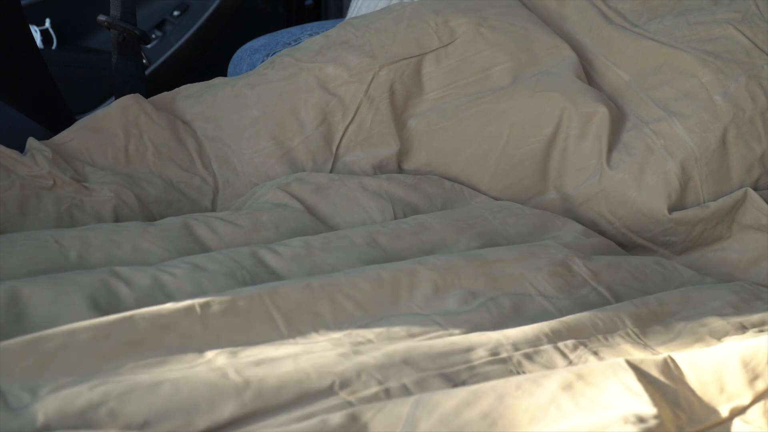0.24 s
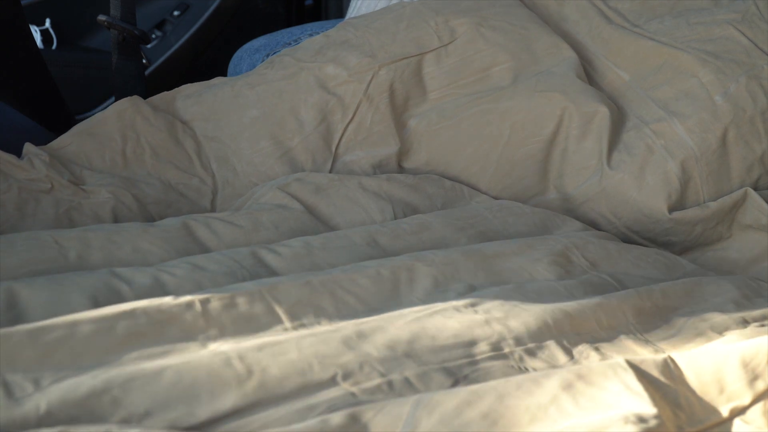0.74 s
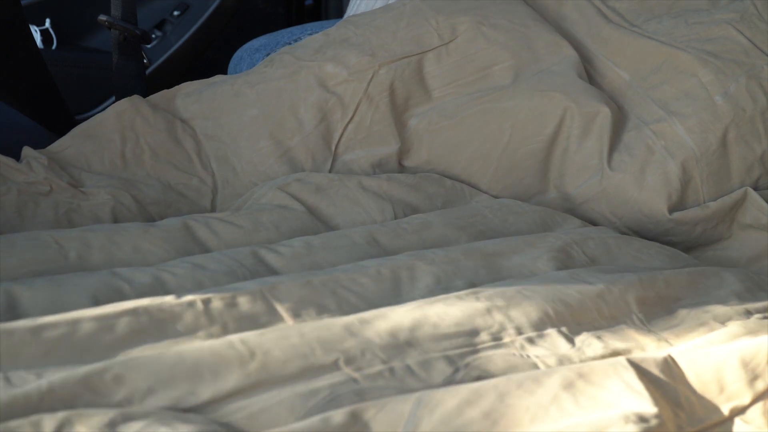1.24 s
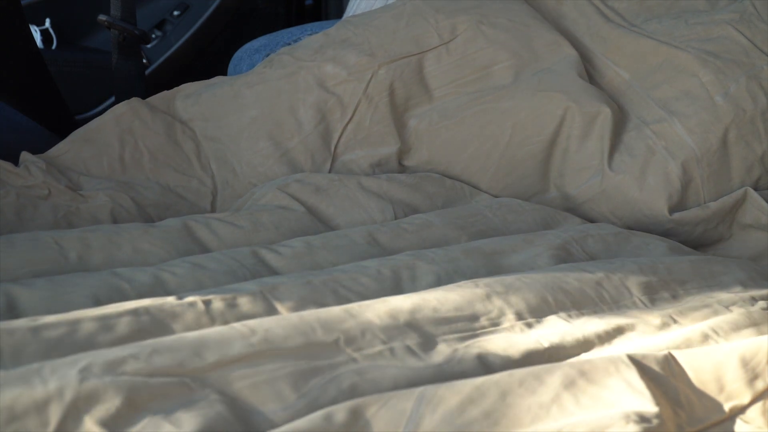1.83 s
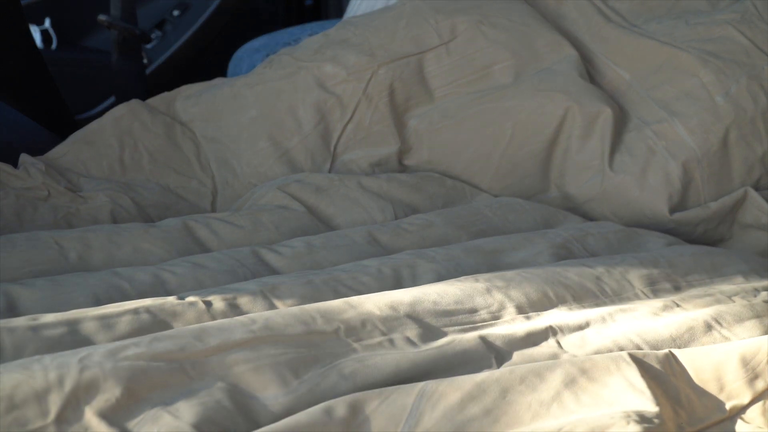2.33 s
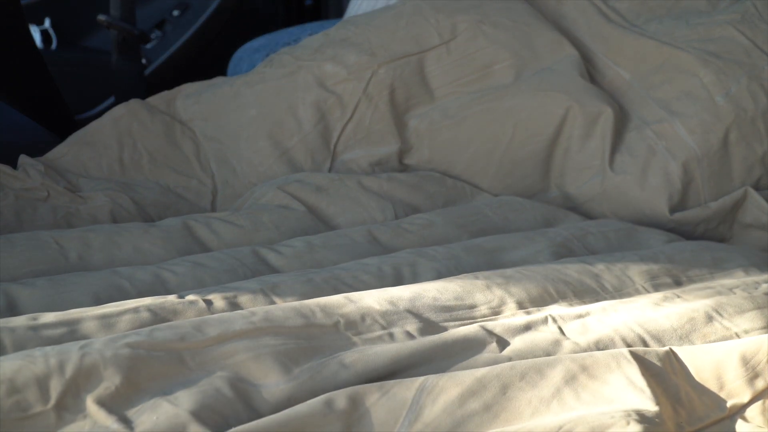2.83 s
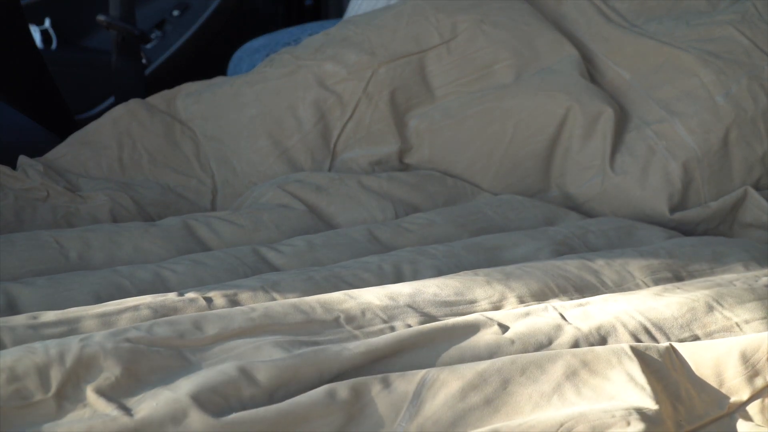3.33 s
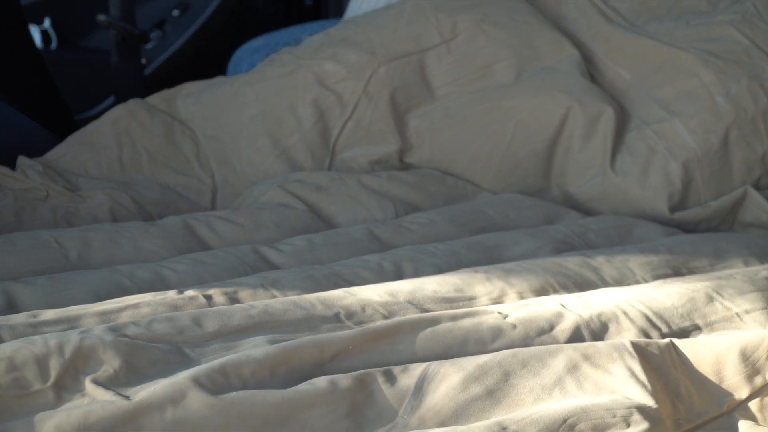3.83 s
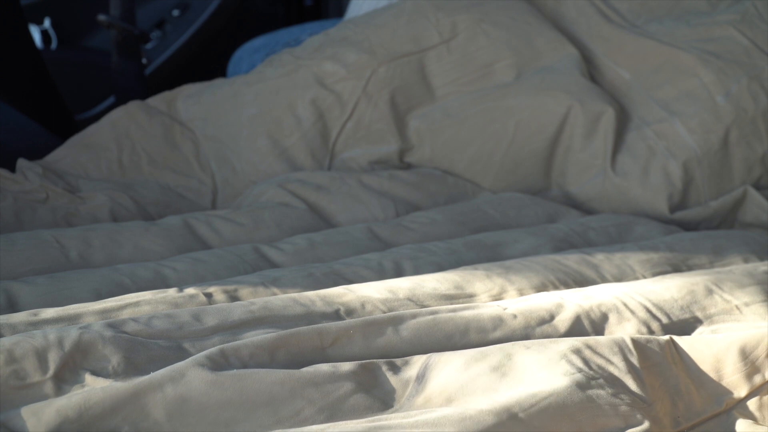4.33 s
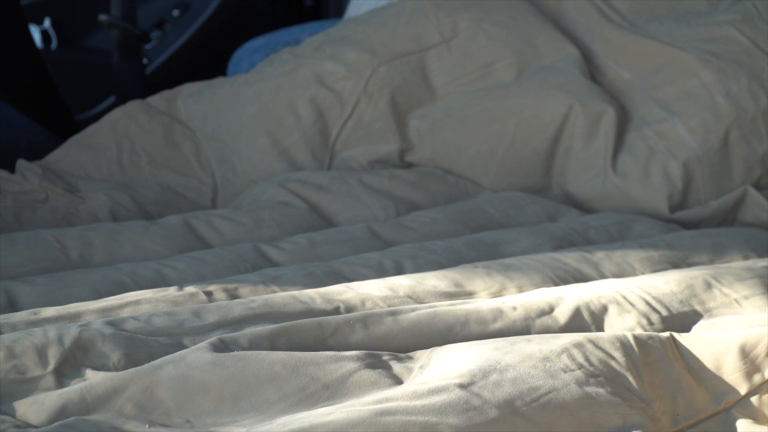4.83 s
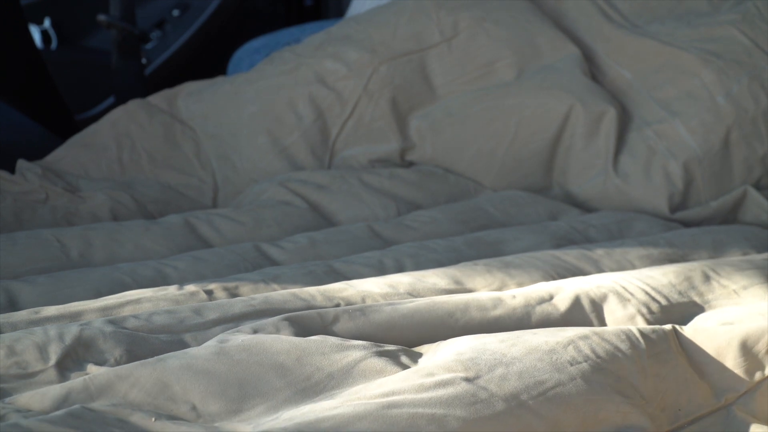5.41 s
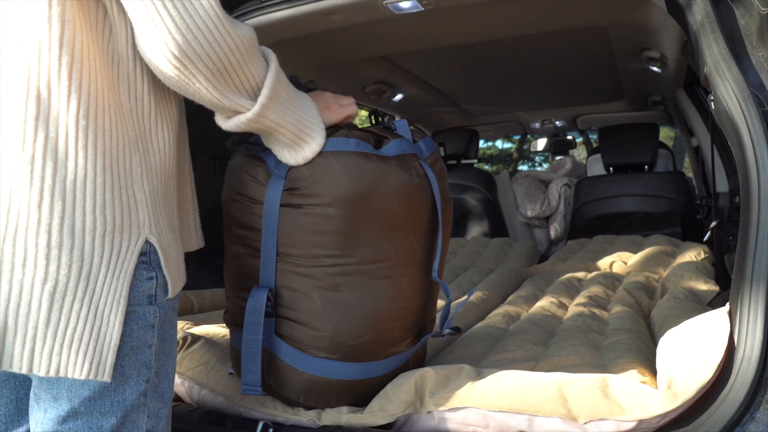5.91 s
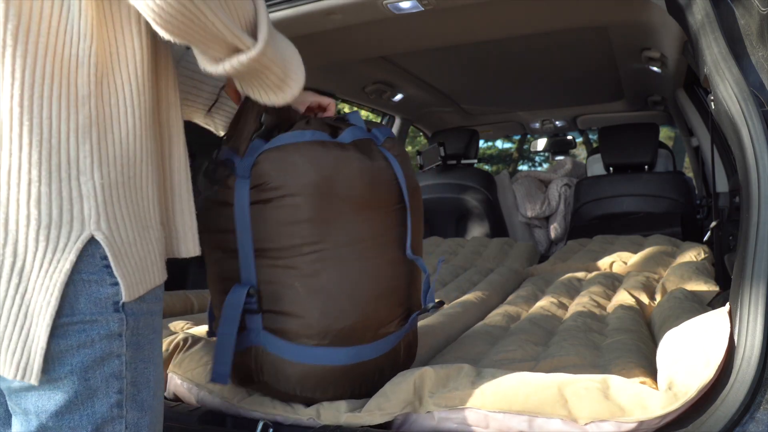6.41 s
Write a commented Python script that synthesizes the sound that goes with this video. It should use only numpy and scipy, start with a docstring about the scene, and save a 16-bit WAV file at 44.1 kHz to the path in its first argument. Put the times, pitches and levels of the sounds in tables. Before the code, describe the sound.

Inside a car, an electric pump fills an air mattress with a steady hum, a high whine and rushing air that grows gradually louder. Light gusts brush the microphone. The whine sputters, then the pump cuts off abruptly. For the last second, at the open tailgate, stronger wind buffets and thumps the microphone over a low outdoor rumble while a packed nylon sleeping bag swishes across the mattress.

```python
"""In the back of a car an electric blower fills an air mattress: its shaft hums, its eight blades whine,
and turbulent air rushes down the hose, louder as the back pressure builds. Light gusts brush the
microphone. The whine sputters and the pump sound ends abruptly. At the open tailgate stronger wind
buffets the microphone over a low outdoor rumble, and a packed nylon sleeping bag slides across
the mattress with a swish of friction."""
import sys
import numpy as np
from scipy import signal
from scipy.fft import rfft, irfft
from scipy.io import wavfile
from scipy.ndimage import uniform_filter1d

SR = 44100
rng = np.random.default_rng(int(sys.argv[2]) if len(sys.argv) > 2 else 0)


def unload_wav(signal):
    """Save mono or channel-first audio to the path in sys.argv[1] as 16-bit WAV at rate SR, clipped to [-1, 1]."""
    wavfile.write(
        sys.argv[1],
        SR,
        np.round(np.clip(np.atleast_2d(signal).T, -1, 1) * 32767).astype(np.int16),
    )


N = 293706

# Gusts on the microphone. Each row: start in seconds, length in seconds, relative level in dB,
# dip of the pump sound in dB.
GUSTS = [(0.0, .03, -33.5, 2), (0.195, .07, -42, 0.5), (0.59, .018, -30, 5), (0.645, 0.047, -31.5, 1.4),
         (0.85, 0.034, -30, 2.5), (1.168, 0.068, -43, 0), (1.407, 0.043, -44, 0), (1.665, 0.078, -37.5, .4),
         (1.885, 0.11, -40, -1.5), (2.05, 0.12, -41.5, .3), (2.218, 0.05, -32.5, .5),
         (2.988, 0.022, -31, 3.5), (3.04, 0.041, -36.5, 1.2), (3.137, 0.056, -33.5, 2.5),
         (3.6, 0.022, -36.5, 2), (3.772, .14, -33, 1.6), (3.971, 0.056, -36, 1.5), (4.1, .13, -33.5, 1.6),
         (4.32, 0.065, -42.5, .5), (4.59, 0.11, -42, 0.7), (5.13, .03, -38.5, 0.7), (5.29, .02, -29.5, 2),
         (5.332, 0.029, -30.5, 5.5), (5.677, 0.029, -25, 0), (5.765, .06, -29.5, 0),
         (5.853, 0.015, -21.5, -2), (5.909, 0.077, -23.5, 0), (6.037, 0.16, -24, 0), (6.367, .04, -35.5, 0),
         (6.417, .055, -27, 0), (6.52, .14, -35, 0)]
# Coherence of the cabin's sound field. Each row: frequency in Hz, left-right correlation.
CABIN_COHERENCE = [(100, 0.98), (600, 1), (1500, 0.7), (3500, 0.32), (7000, 0.47), (15000, 0.39)]


def impeller(load, blade_count=8, slack_hum_db=-31.5, load_rise_db=7.5):
    """Rotating imbalance hums once a turn; the blades and their unevenness sound at multiples of that."""
    # Motor speed. Each row: time in seconds, shaft rate in Hz.
    speed = [(0.0, 472.4), (0.6, 473.6), (1.25, 474.4), (1.43, 476.7), (1.6, 475.8), (3.0, 476.7),
             (4.3, 477.8), (4.7, 475.5), (5.11, 478.5), (5.34, 475), (5.44, 475.3), (5.53, 478)]
    # Second harmonic of the hum. Each row: time in seconds, relative level in dB.
    octave = [(0.0, -55), (0.6, -54.5), (0.86, -59.5), (1.87, -46.5), (4.24, -40), (4.27, -38), (5.09, -38),
              (5.31, -43.5), (5.64, -40.5)]
    shaft_hz, = curves(speed)
    octave_db, = curves(octave)
    turn = 2 * np.pi * np.cumsum(shaft_hz * (1 + .0002 * walk(25.13))) / SR
    hum = tone(turn, slack_hum_db + load_rise_db * load + 0.34 * walk(30), pan_db=-1.2, lead=0.13)
    hum += tone(2 * turn, octave_db + walk(30) + 0.24, pan_db=-0.4, lead=0.012)
    return hum + whine(blade_count * turn + 0.11 * walk(90)) + buzz(turn) + flow_overtones(turn)


def whine(phase, breakup_s=4.93, edge_s=0.02):
    """The blade-passing tone shifts with the cabin's standing waves, then breaks into spurts."""
    # Sustained whine. Each row: time in seconds, relative level in dB, left minus right in dB.
    levels = [(0.0, -23.5, -3.0), (0.15, -24, -3.0), (0.66, -26, 2.5), (1.25, -24, 8.5), (1.34, -29, 10),
              (1.45, -31.5, -11.5), (1.59, -29.5, 3.0), (1.84, -30, -8), (2.97, -26.5, 4),
              (3.14, -23.5, 0.0), (3.24, -22.5, 1.5), (3.73, -23, 1.5), (3.86, -26.5, 5), (4.45, -24, 6.5),
              (4.75, -22.5, 0.5), (4.93, -24, 9)]
    # Its phase at the two microphone ports. Each row: time in seconds, left lead in radians.
    leads = [(0, 1.1), (.6, 1.44), (1.1, 1), (1.4, -0.94), (1.9, 0.038), (2.35, 1.1), (2.75, 1.38),
             (3.2, 0.63), (4.1, -0.14), (5.6, 0.93)]
    # Spurts. Each row: start in seconds, length in seconds, level in dB, left minus right in dB,
    # left lead in radians.
    spurts = [(4.974, 0.076, -38, 4, -2.5), (5.095, 0.074, -22, -2, -1), (5.244, 0.066, -26.5, 14, 0.7),
              (5.344, 0.11, -26, 10, .8), (5.506, 0.064, -36.5, -2, -2.4), (5.605, .06, -32, 9, 3.2)]
    db, pan_db = curves(levels)
    lead, = curves(leads)
    out = tone(phase, db + 0.44, pan_db, lead) * envelope(0, breakup_s, edge_s, 2 * edge_s)
    for start, length, db, pan_db, lead in spurts:
        out += tone(phase, db, pan_db, lead) * envelope(start, length, edge_s, edge_s)
    return out * undb(0.57 * walk(50) + .5 * walk(10))


def buzz(turn):
    """Uneven blades repeat their pattern once a turn and so radiate low shaft harmonics."""
    # Strength of the buzz. Each row: time in seconds, relative level in dB.
    levels = [(0.0, -56), (0.09, -52), (0.44, -53), (0.89, -51), (2.09, -38), (3.12, -40.5), (3.75, -35),
              (4.21, -40), (5.64, -49.5)]
    # Its harmonics. Each row: shaft order, relative level in dB.
    orders = [(3, -8), (4, 1.5)]
    buzz_db, = curves(levels)
    out = sum(overtone(order * turn, buzz_db + db - 1.5, drift_db=0, flutter_db=0.5, jitter_rad=0.15,
                       spread_db=-0.5, spread_rad=0.35) for order, db in orders)
    return out * undb([[3], [-3.5]])


def flow_overtones(turn, loaded_s=1.36, fade_s=.15):
    """Back pressure makes the flow uneven, which raises most of the higher shaft harmonics."""
    # Harmonics. Each row: shaft order, level in dB with the mattress slack, level in dB under load.
    orders = [(5, -46.5, -42.5), (6, -50.5, -50), (7, -45, -43), (9, -57, -49), (10, -52, -55),
              (11, -63, -58), (12, -65, -56), (13, -62, -58), (15, -63, -57), (16, -50.5, -50.5),
              (17, -62, -58), (18, -63, -56), (20, -67, -61), (21, -67, -58), (22, -74, -63),
              (24, -63, -60), (32, -56, -52)]
    # A harmonic swells while a standing wave lies on the microphone.
    # Each row: shaft order, start in seconds, end in seconds, level in dB.
    swells = [(5, 3.3, 4.6, -40), (6, 4.25, 5.5, -44.5), (9, 1.3, 2.8, -45), (15, 4.24, 4.8, -45),
              (16, 1.65, 2.05, -46), (17, 2.85, 4.15, -47), (20, 1.3, 3.85, -52.5), (24, 4.25, 5.6, -53.5),
              (32, 2.1, 3.35, -46.5)]
    t, out = np.arange(N) / SR, np.zeros((2, N))
    for order, slack_db, loaded_db in orders:
        db = slack_db + (loaded_db - slack_db) * ramp(t - loaded_s, fade_s)
        for swell_order, start, end, top_db in swells:
            if swell_order == order:
                db += (top_db - db) * ramp(np.minimum(t - start, end - t), fade_s)
        out += overtone(order * turn, db, drift_db=0.0871 * order, flutter_db=1.36,
                        jitter_rad=0.013 * order, spread_db=3, spread_rad=0.48)
    return out


def overtone(phase, db, drift_db, flutter_db, jitter_rad, spread_db, spread_rad):
    """Turbulence modulates a harmonic's amplitude and phase; its level and direction drift slowly."""
    db = db + drift_db * walk(1.76) + flutter_db * walk(45)
    phase = phase + rng.uniform(0, 2 * np.pi) + jitter_rad * walk(60)
    sides = np.array([[.5], [-.5]])
    amplitude = np.sqrt(2) * undb(db + sides * spread_db * walk(1.4))
    return amplitude * np.sin(phase + sides * spread_rad * walk(1.21))


def airflow(load, roar_db=-44.5, hiss_db=-52.64, flutter_db=.6):
    """Turbulence makes broadband noise, a roar in the hose and a hiss at the valve; both grow with load."""
    # Spectra of roar and hiss. Each row: frequency in Hz, relative spectral density in dB.
    roar_spectrum = [(150, -4.5), (280, -9), (420, -0.5), (560, -1), (780, -13.5), (1050, -9.5), (1650, -6),
                     (1850, -1), (2400, 0.5), (2650, -2), (3700, 2), (4400, -1.5), (6200, -10.5),
                     (9000, -24)]
    hiss_spectrum = [(2500, -4.5), (4500, -14), (5600, 2), (6200, 2.5), (7000, 7.5), (8000, 3), (9000, 0),
                     (10000, -.5), (11000, -1), (12000, -3.5), (15000, -3)]
    roar = unit_rms(hose(noise(roar_spectrum, CABIN_COHERENCE)), 2000, 3250)
    hiss = unit_rms(hose(noise(hiss_spectrum, CABIN_COHERENCE)), 8300, 14000)
    roar *= undb(roar_db + 7.5 * load + flutter_db * walk(35))
    hiss *= undb(hiss_db + 8 * load + flutter_db * walk(35))
    return roar * undb([[.6], [-.6]]) + hiss * undb([[-.9], [.9]])


def hose(x):
    """Resonance in the hose and pump housing lifts the noise near each natural frequency."""
    # Resonances. Each row: centre in Hz, width in Hz, lift in dB.
    modes = [(708, 55, 8.5), (1980, 85, 4.5), (2240, 74, 1.5), (2830, 50, 4), (3120, 124, 4),
             (3430, 79, 4.5), (3867, 170, 6), (5510, 130, 7), (7490, 94, 5), (10000, 210, 3),
             (14300, 400, 5)]
    hz = np.fft.rfftfreq(N, 1 / SR)
    lift_db = sum(db / (1 + (2 * (hz - centre) / width) ** 2) for centre, width, db in modes)
    return irfft(rfft(x) * undb(lift_db), N)


def sleeping_bag(split_hz=5500, grain_db=1.3, release_s=0.032):
    """Stick-slip friction of nylon weave on the mattress gives a fine-grained swish at each stroke."""
    # Friction noise. Each row: frequency in Hz, relative spectral density in dB.
    spectrum = [(200, -2), (500, 5.5), (900, 2), (1500, 0.5), (2500, 0), (4500, -2.5), (7000, 0),
                (10000, 0.5), (15000, -3.5)]
    # Its coherence. Each row: frequency in Hz, left-right correlation.
    coherence = [(300, 1), (2000, 0.94), (5000, 0.87), (15000, .55)]
    # Strokes. Each row: time of reaching full speed, length and attack, all in seconds,
    # then relative level in dB, treble against that level in dB.
    strokes = [(5.7, .07, .025, -47.5, 6), (5.83, 0.078, 0.022, -57, 0), (5.933, .06, 0.029, -54, 1.5),
               (6.274, .015, .003, -54, 4.5), (6.314, 0.065, .01, -60.5, -4), (6.625, .05, 0.087, -34, 2.5)]
    cloth = noise(spectrum, coherence)
    body = signal.sosfiltfilt(signal.butter(2, split_hz, fs=SR, output="sos"), cloth)
    sheen = unit_rms(cloth - body, 6000, 15000)
    body = unit_rms(body, 2200, 5000)
    out = sum((body + sheen * undb(treble_db)) * undb(db) * envelope(start, length, attack, release_s)
              for start, length, attack, db, treble_db in strokes)
    return out * undb(grain_db * walk(400) + 1.15 * walk(50) - 0.8)


def wind(gust_db, flutter_db=4.15, brighten=0.17, edge_hz=330):
    """Turbulent pressure beats on each port; harder gusts have smaller eddies and sound brighter."""
    # Wind noise. Each row: frequency in Hz, relative spectral density in dB.
    spectrum = [(20, -17), (45, -6.5), (100, -.5), (135, 0), (175, -3.5), (240, -3.5), (400, -10.5),
                (550, -19.5), (720, -24.5), (920, -28), (1200, -39), (1600, -46), (3000, -68)]
    # Its coherence. Each row: frequency in Hz, left-right correlation.
    coherence = [(60, 0.73), (130, 0.68), (280, 0.0046), (600, 0.036)]
    air = unit_rms(noise(spectrum, coherence), 130, 400)
    large = band(air, 0, edge_hz / 2)
    middle = band(air, edge_hz / 2, edge_hz)
    small = air - large - middle
    eddies_db = flutter_db * np.tanh(walk(110))  # eddy strength wanders but stays within fixed bounds
    large *= undb(0.44 * eddies_db + 0.5)
    middle *= undb(eddies_db)
    small *= undb(1.7 * eddies_db + brighten * (gust_db - gust_db.max()))
    return (large + middle + small) * undb(gust_db - 0.77)


def gust_level(outside, inside_db=-53.5, outside_db=-45):
    """Wind is intermittent: gusts stand out of a wandering breeze. Gives its relative level in dB."""
    breeze = undb(inside_db + (outside_db - inside_db) * outside + 5.1 * walk(6.2))
    gusts = [undb(db) * envelope(start, length, attack_s=0.017, release_s=0.019)
             for start, length, db, _ in GUSTS]
    return 20 * np.log10(np.maximum(breeze, np.max(gusts, axis=0)))


def gust_dips():
    """Amplitude modulation: a gain that lowers the pump sound briefly under most gusts."""
    dips_db = [db * envelope(start, length, attack_s=0.0022, release_s=.03)
               for start, length, _, db in GUSTS]
    return undb(-np.max(dips_db, axis=0))


def thumps(spread_db=3.5):
    """Pressure is low in a vortex core: it passes as a brief suction between two softer pushes."""
    # Single eddies. Each row: time in seconds, peak level in dB, width in seconds.
    vortices = [(5.693, -20, .0009), (5.863, -11.5, .0012), (5.906, -18, 0.00083), (5.924, -20, .0009),
                (5.979, -18, 0.00067), (6.082, -11, 0.00096), (6.103, -11, 0.00085),
                (6.142, -10.5, 0.00076), (6.429, -18.5, 0.00059), (6.459, -14, 0.00085)]
    t, out = np.arange(N) / SR, np.zeros((2, N))
    for (centre, db, width), side in zip(vortices, rng.standard_normal(len(vortices))):
        u = (t - centre) / width
        pulse = (u ** 2 - 1) * np.exp(-u ** 2 / 2)
        out += pulse * undb(db + spread_db * side * np.array([[1], [-1]]))
    return out


def port(pressure, limit_db=-8, top_hz=1300):
    """Saturation and low-pass filtering in the narrow microphone ports round off the hardest pushes."""
    limit = undb(limit_db)
    return signal.sosfilt(signal.butter(2, top_hz, fs=SR, output="sos"), limit * np.tanh(pressure / limit))


def rumble(outside, inside_db=-40, outside_db=-32):
    """Low-frequency ambient noise from outdoors, stronger at the open tailgate."""
    # Outdoor rumble. Each row: frequency in Hz, relative spectral density in dB.
    spectrum = [(20, -11), (45, -5), (65, 4.5), (90, 1.5), (130, -3.5), (200, -21), (400, -22), (1000, -24),
                (3000, -37), (15000, -51)]
    air = unit_rms(noise(spectrum, CABIN_COHERENCE), 30, 130)
    return air * undb(inside_db + (outside_db - inside_db) * outside + 0.71 * walk(2.53))


def tone(phase, db, pan_db, lead):
    """A sine with level and phase differences between two ports; db sets the rms of their mean."""
    left = undb(pan_db / 2) * np.exp(.5j * lead)
    ports = np.array([left * np.ones(N), np.ones(N) / left])
    return np.sqrt(2) * undb(db) * np.imag(ports * np.exp(1j * phase)) / np.abs(ports.mean(axis=0))


def noise(spectrum, coherence):
    """Partly coherent stereo noise: the sum and difference of two independent coloured noises."""
    alike = np.clip(over_hz(coherence), -1, 1)
    mid, side = rfft(rng.standard_normal((2, N))) * np.sqrt([1 + alike, 1 - alike])
    return irfft(np.array([mid + side, mid - side]) * undb(over_hz(spectrum)), N)


def walk(rate_hz):
    """Random modulation: levels held for 1 / rate_hz seconds and smoothed twice; spread near 1."""
    hold = max(int(SR / rate_hz), 2)
    held = np.repeat(rng.standard_normal(N // hold + 1), hold)
    return 1.35 * uniform_filter1d(uniform_filter1d(held, hold), hold)[:N]


def envelope(start_s, length_s, attack_s, release_s):
    """Exponential rise until start_s, a hold at 1, exponential decay."""
    t = np.arange(N) / SR - start_s
    return np.exp(np.minimum(0, np.minimum(t / attack_s, (length_s - t) / release_s)))


def ramp(t, fade_s):
    """Linear fade from 0 to 1, centred on t = 0."""
    return np.clip(t / fade_s + .5, 0, 1)


def band(x, lo_hz, hi_hz):
    """Ideal band-pass filter."""
    hz = np.fft.rfftfreq(N, 1 / SR)
    return irfft(rfft(x) * ((hz >= lo_hz) & (hz < hi_hz)), N)


def unit_rms(x, lo_hz, hi_hz):
    """Normalise a stereo sound so that the mean of its channels has rms 1 in a band."""
    return x / np.std(band(x.mean(axis=0), lo_hz, hi_hz))


def curves(table):
    """Linear interpolation of a table's columns over time, one value per sample."""
    times, *columns = np.transpose(table)
    return [np.interp(np.arange(N) / SR, times, column) for column in columns]


def over_hz(points):
    """Interpolation on a log-frequency axis, one value per FFT bin."""
    hz, value = np.transpose(points)
    return np.interp(np.log(np.fft.rfftfreq(N, 1 / SR) + 1), np.log(hz), value)


def undb(db):
    """Decibels to amplitude ratio."""
    return 10 ** (np.asarray(db) / 20)


def scene(pump_end_s=5.662):
    """Superposition of the sources: the pump, then the bag, with wind and rumble throughout."""
    # Back pressure of the mattress. Each row: time in seconds, load from 0 (slack) to about 1 (firm).
    back_pressure = [(0.0, 0.0), (0.3, 0.22), (0.8, 0.25), (2.0, 0.66), (2.75, 0.94), (3.8, 0.93),
                     (4.5, 0.96), (5.04, 1.1), (5.2, 1), (5.6, 0.97)]
    load, = curves(back_pressure)
    outside = ramp(np.arange(N) / SR - pump_end_s, fade_s=0.0053)
    pump = (impeller(load) + airflow(load)) * gust_dips()
    gusts = port(wind(gust_level(outside)) + thumps())
    return pump * (1 - outside) + sleeping_bag() * outside + gusts + rumble(outside)


def record(dry, top_hz=15700):
    """Band limiting: a steep elliptic low-pass removes the highest treble."""
    return signal.sosfilt(signal.ellip(10, .1, 80, top_hz, fs=SR, output="sos"), dry)


dry = scene()
out = record(dry)
unload_wav(out)
```